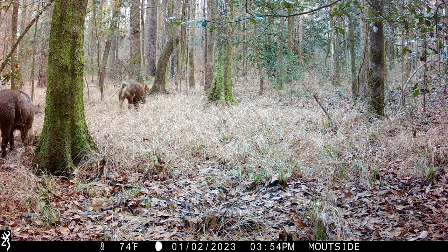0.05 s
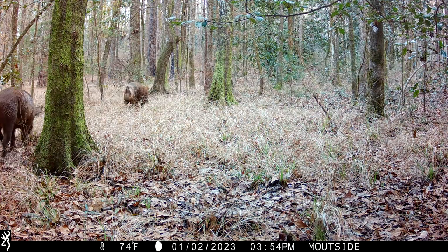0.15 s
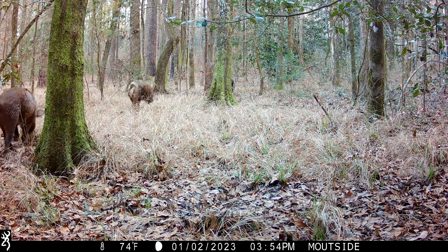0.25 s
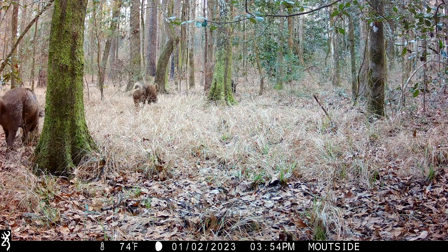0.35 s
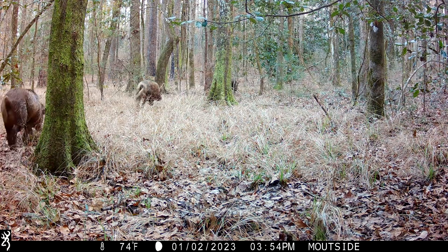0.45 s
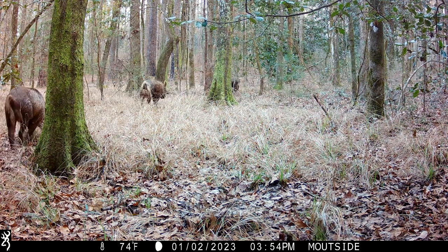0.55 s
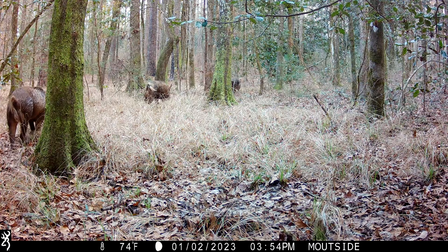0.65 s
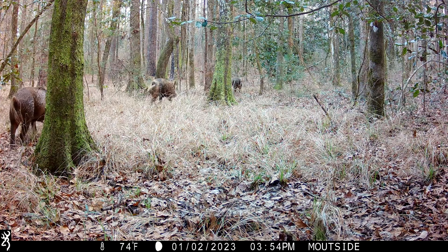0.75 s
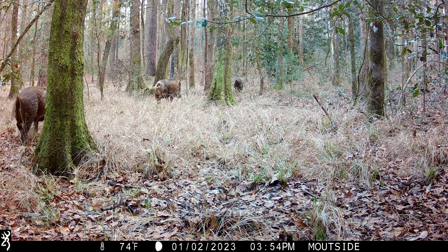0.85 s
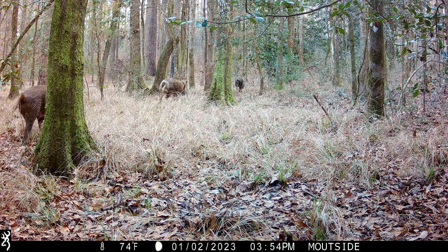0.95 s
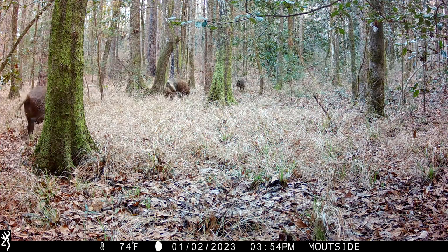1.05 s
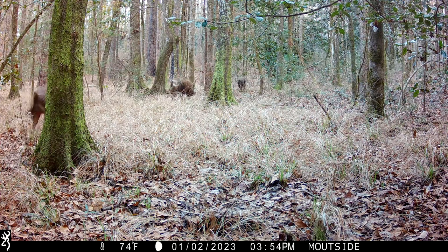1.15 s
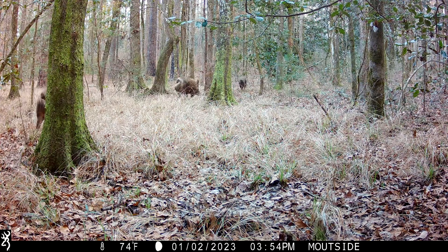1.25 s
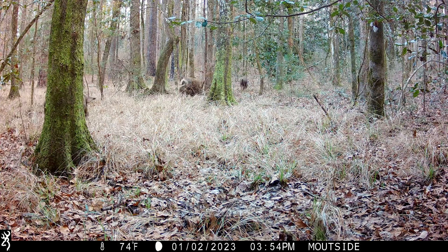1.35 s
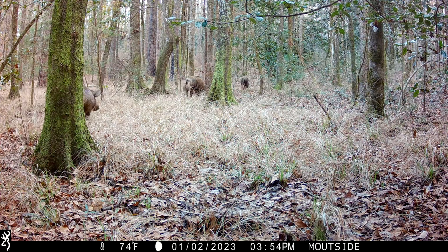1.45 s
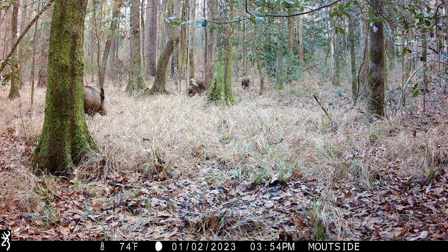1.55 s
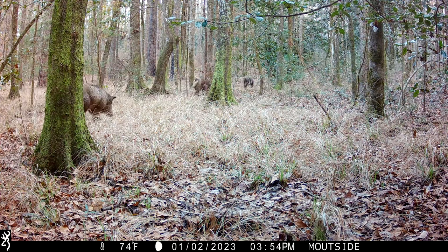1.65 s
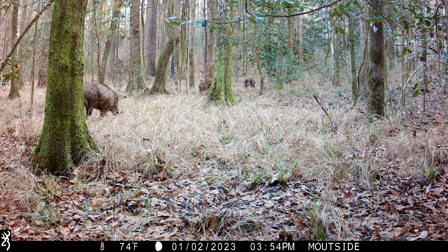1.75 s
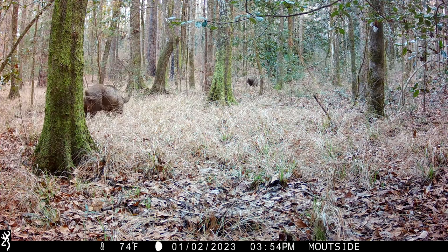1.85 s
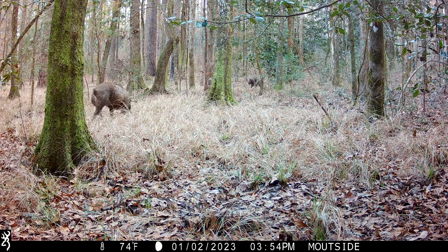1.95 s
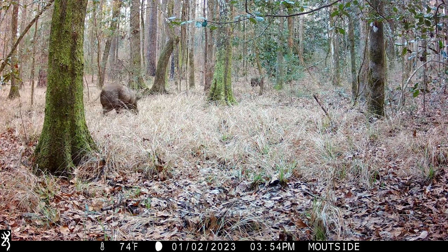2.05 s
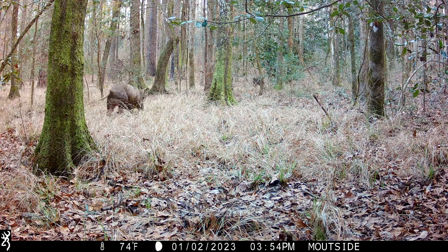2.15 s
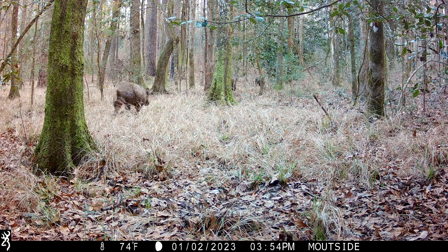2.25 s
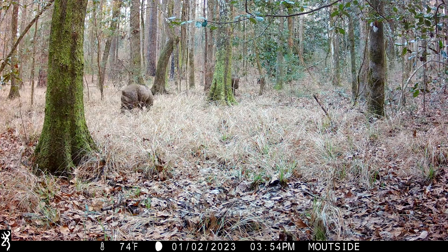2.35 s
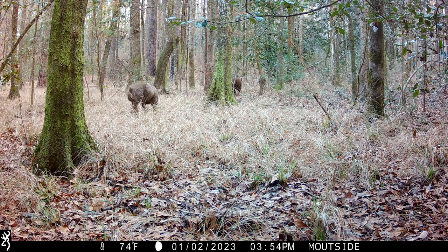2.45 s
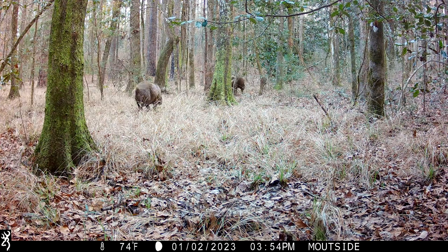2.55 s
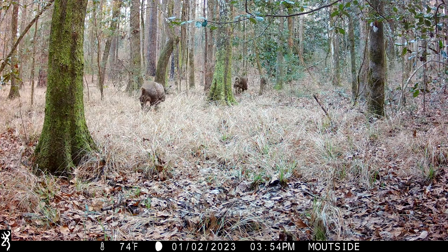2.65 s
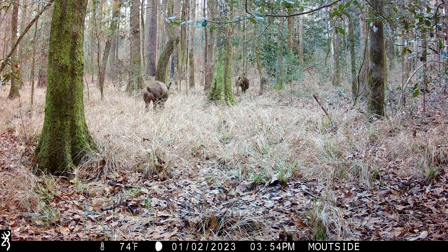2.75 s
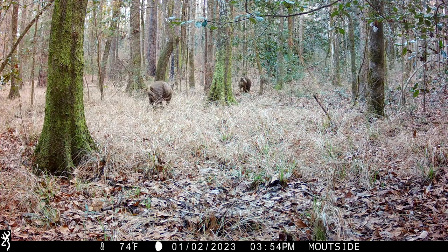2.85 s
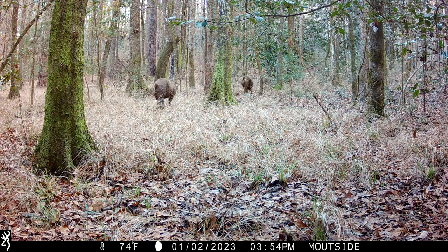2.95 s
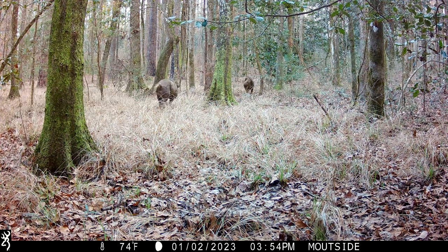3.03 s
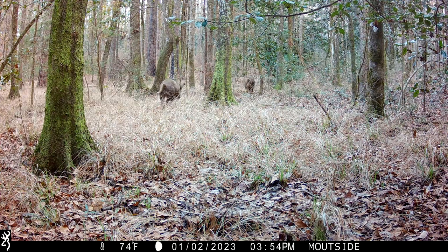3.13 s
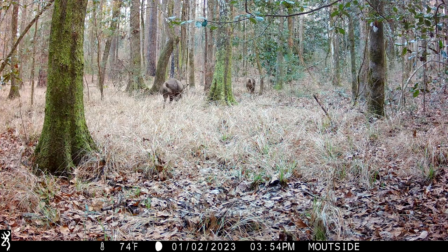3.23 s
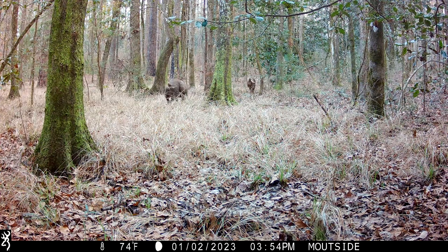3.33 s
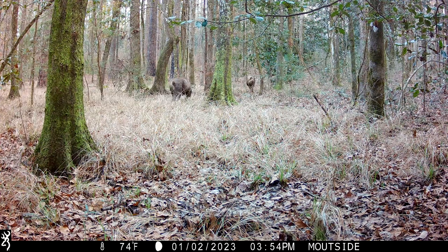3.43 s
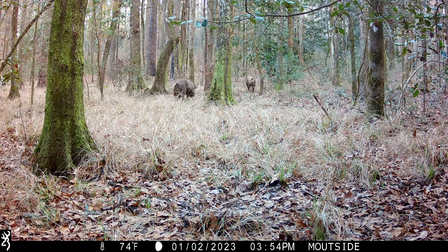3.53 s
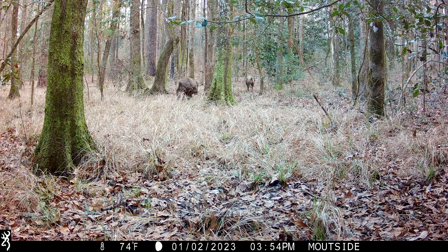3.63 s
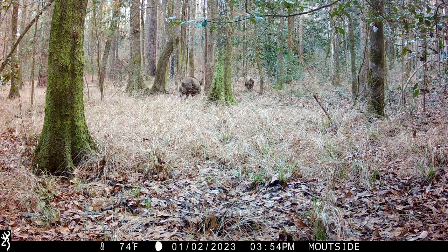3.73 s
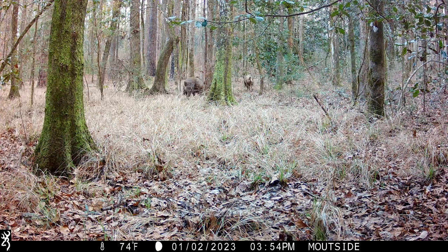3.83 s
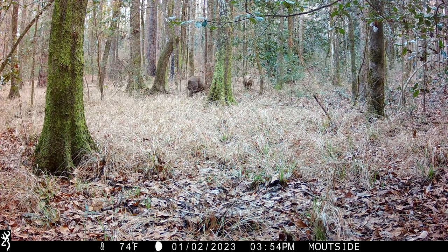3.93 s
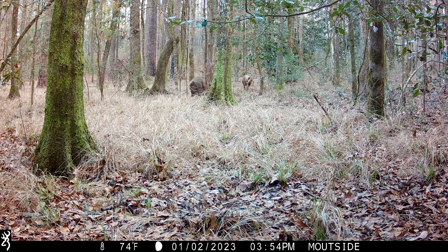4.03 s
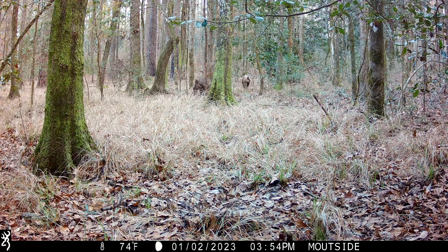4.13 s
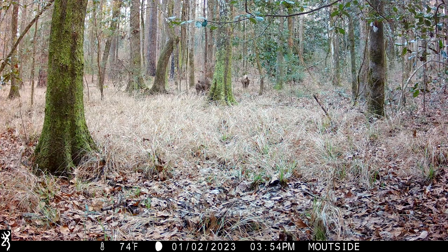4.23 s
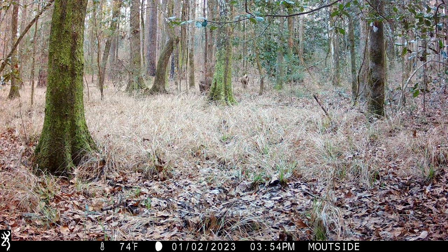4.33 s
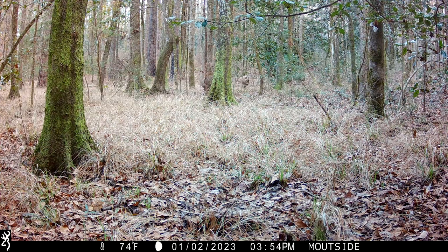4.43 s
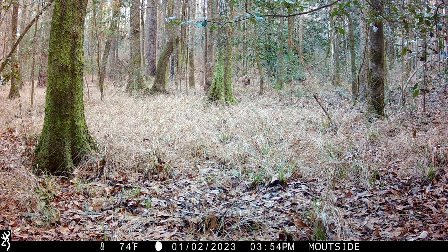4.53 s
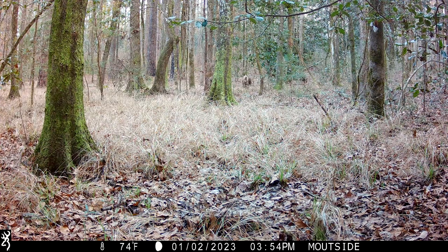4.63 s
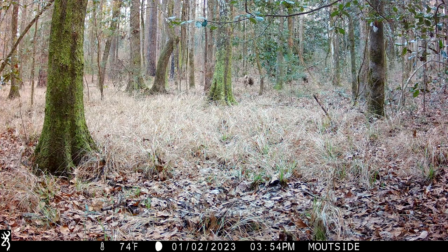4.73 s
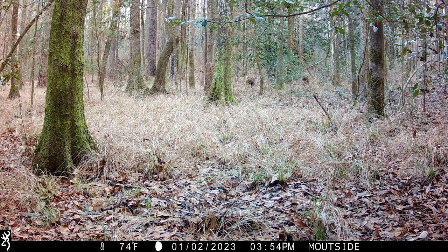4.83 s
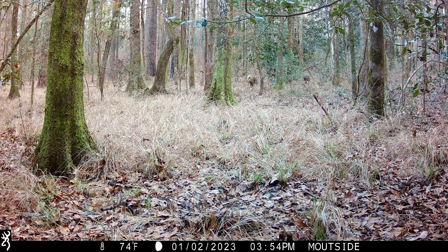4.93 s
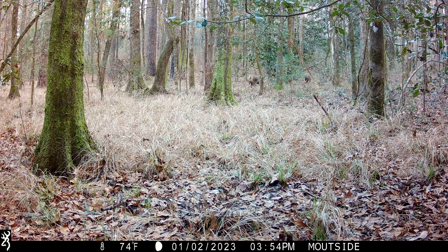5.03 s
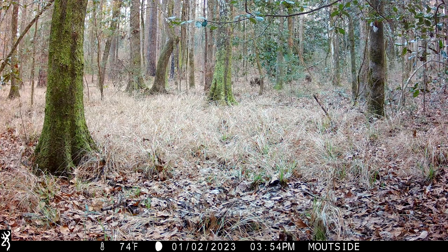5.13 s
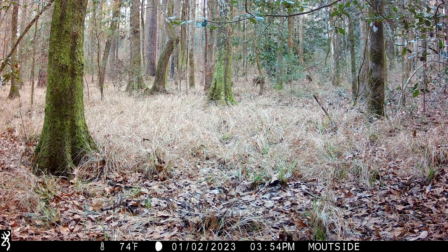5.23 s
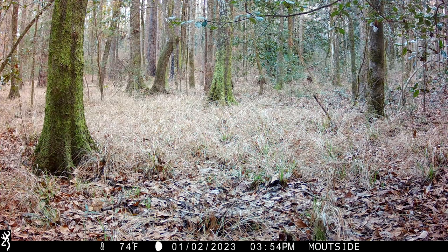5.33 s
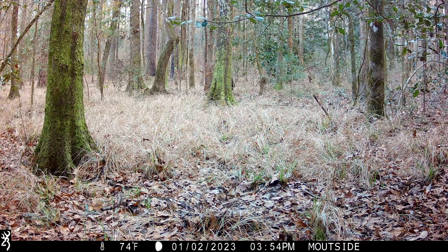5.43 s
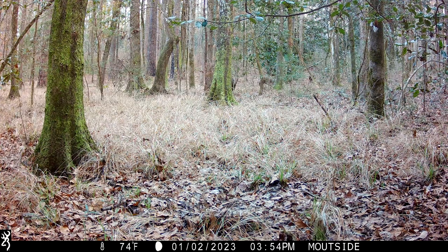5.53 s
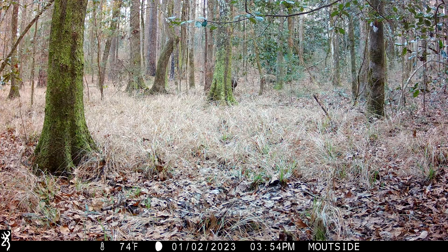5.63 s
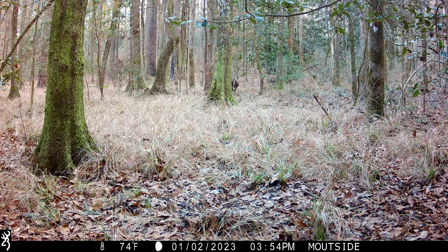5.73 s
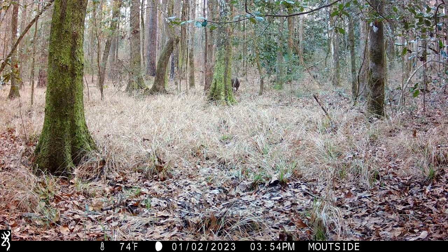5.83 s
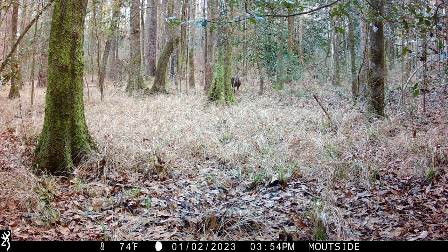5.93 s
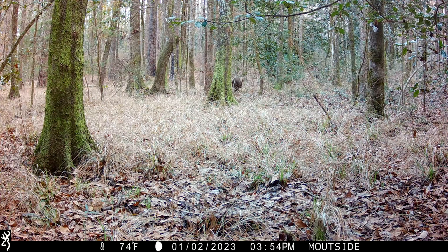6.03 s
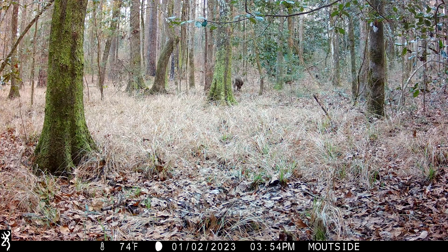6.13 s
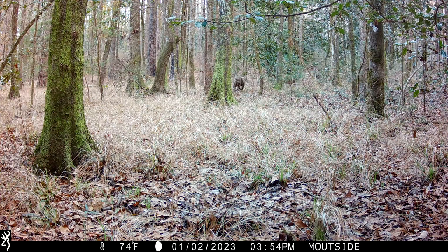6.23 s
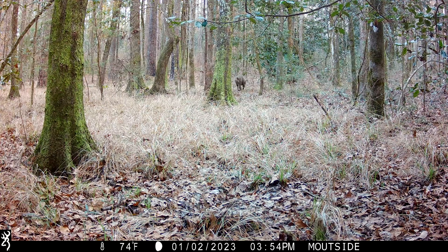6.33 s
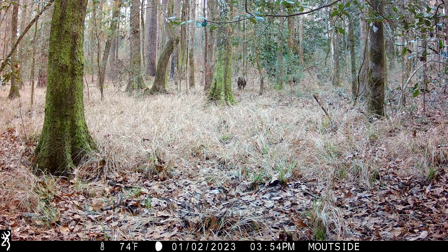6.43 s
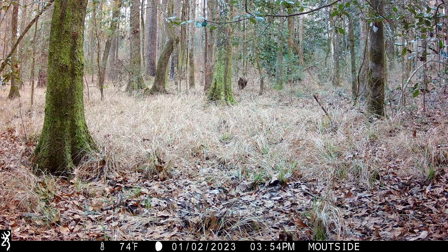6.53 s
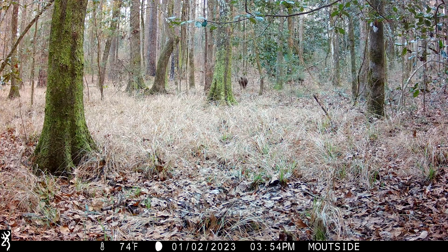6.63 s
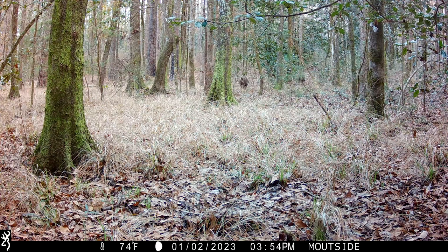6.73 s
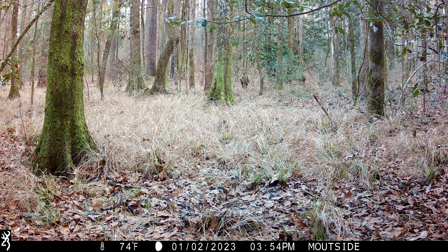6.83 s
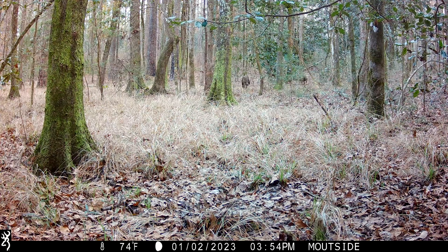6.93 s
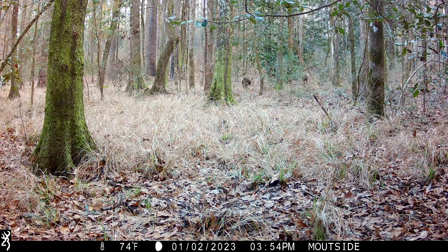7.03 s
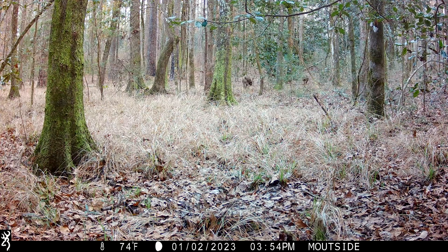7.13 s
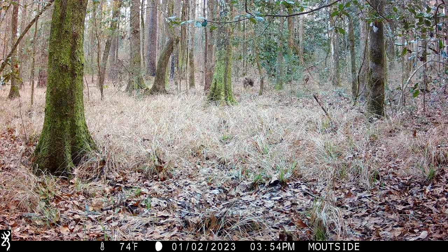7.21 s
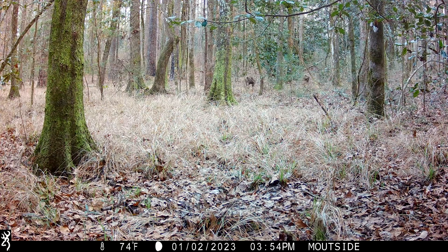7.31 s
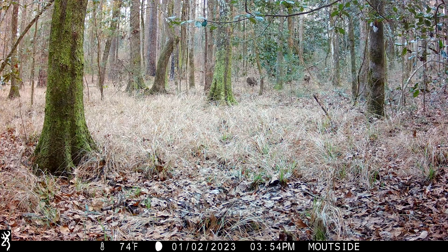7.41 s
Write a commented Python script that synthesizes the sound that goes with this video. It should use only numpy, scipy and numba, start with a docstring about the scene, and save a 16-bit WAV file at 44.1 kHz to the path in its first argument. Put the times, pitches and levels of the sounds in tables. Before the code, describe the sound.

In quiet woodland, a fixed microphone hears wild hogs walking away through dry grass and leaf litter. From the start the rustle is close and crisp, with hooves crunching and a tight burst of twig snaps around 0.1 to 0.2 seconds. Very low, soft, pulsing grunts sit under it at about 0.3 to 0.9 seconds. From 1 to 1.9 seconds the snaps are sparser while leaves keep swishing in strides. Between 2 and 3 seconds crackling thickens again, with a firm crunch near 2.5 and many brittle snaps. Short, faint grunts come around 3.2 to 3.6. After that the rustle dulls and recedes, with occasional weak ticks, more barely heard grunts near 4.8 to 5.5 and a soft swell of leaves around 5.4. By 6 to 7.4 seconds only faint, distant rustling remains over a steady airy hush, with a slight diffuse tail from the trees.

```python
"""In a wood, wild hogs walk away through dry grass and leaf litter, past the trees.
Leaves crackle as many tiny damped rings and clicks, hooves crunch as short swells of denser crackle,
twigs snap as brief rings with a sharp tick, and low, soft grunts are slow pulses through resonances.
A noise tail from the trunks follows it all except the steady hush and faint rumble of the air."""
import sys
import numpy as np
from scipy import signal
from scipy.fft import rfft, irfft
from scipy.io import wavfile
from scipy.ndimage import uniform_filter1d
from numba import njit

SR = 44100
rng = np.random.default_rng(int(sys.argv[2]) if len(sys.argv) > 2 else 0)


def to_wav(s):
    """Save 16-bit WAV."""
    ch = np.atleast_2d(s).T  # columns
    pcm = np.round(np.clip(ch, -1, 1) * 32767)  # PCM
    wavfile.write(sys.argv[1], SR, pcm.astype(np.int16))


N = 329427
T = np.arange(N) / SR  # time in s


def undb(db):
    """Turn decibels into a gain."""
    return 10 ** (np.asarray(db) / 20)


def unit(x):
    """Scale to an average strength (rms) of 1."""
    return x / np.sqrt(np.mean(x ** 2) + 1e-20)


def curves(table):
    """Join the columns of a table by straight lines in time."""
    s, *columns = np.transpose(table)
    return [np.interp(T, s, c) for c in columns]


def add(out, s, x):
    """Mix x in at time s."""
    i = max(int(s * SR), 0)
    out[i:i + len(x)] += x[:max(N - i, 0)]


def band(x, lo_hz, hi_hz, order=2):
    """Keep only the pitches between two limits."""
    sos = signal.butter(order, [lo_hz, min(hi_hz, SR / 2 - 1)], "band", fs=SR, output="sos")
    return signal.sosfilt(sos, x)


def resonate(x, hz, q):
    """One resonance, gain 1 at its centre; a higher q is narrower."""
    return signal.lfilter(*signal.iirpeak(hz, q, fs=SR), x)


def colour(x, points, size=4096):
    """Filter through (f/Hz, level/dB) points without pre-echo, so that clicks keep their sharp front."""
    hz, db = np.transpose(points)
    bins_hz = np.arange(size // 2 + 1) * SR / size
    gain = undb(np.interp(np.log(bins_hz + 1), np.log(hz), db))
    # folding the cepstrum puts the filter's energy as early as possible (minimum phase)
    cepstrum = irfft(np.log(gain))
    cepstrum[1:size // 2] *= 2
    cepstrum[size // 2 + 1:] = 0
    response = irfft(np.exp(rfft(cepstrum)))
    return signal.fftconvolve(x, response)[:len(x)]


def walk(rate):
    """Slow random wavering with a spread near 1, from `rate` new random values a second."""
    k = max(int(SR / rate), 1)
    held = np.repeat(rng.standard_normal(N // k + 1), k)
    return np.sqrt(2) * uniform_filter1d(held, k)[:N]


def burst(decay_s, size=1024):
    """A sharp crack of noise dying away at once; unit energy."""
    x = rng.standard_normal(size) * np.exp(-np.arange(size) / SR / decay_s)
    return x / np.linalg.norm(x)


@njit
def ring(starts, poles, sizes, size):
    """Each grain is one damped oscillation, turned and shrunk by its pole at every sample."""
    out = np.zeros(size)
    for k in range(len(starts)):
        z = 1. + 0j
        i = starts[k]
        while i < size and z.real ** 2 + z.imag ** 2 > 1e-5:
            out[i] += sizes[k] * z.real
            z *= poles[k]
            i += 1
    return out


def crackle(rate, spread_db, cycles, snap):
    """Tiny fractures, `rate` a second: each clicks and rings its own leaf for a few cycles."""
    when, pitch, force, side = rng.random((int(rate * N / SR), 4)).T
    starts = (when * N).astype(np.int64)
    hz = 600 * 25 ** pitch  # 600 to 15000 Hz, even in octaves
    sizes = np.sign(side - .5) * undb(-spread_db * np.log(force + .02))
    poles = np.exp((2j * np.pi - 1 / max(cycles, .5)) * hz / SR)
    rings = ring(starts, poles, sizes * hz, N)
    clicks = np.bincount(starts, sizes, N)
    return unit(unit(rings) + snap * unit(clicks))


def clumps(rate, decay_s, depth):
    """Leaves give way in clumps, about `rate` a second: each starts at once and dies down."""
    kicks = (rng.random(N) < rate / SR) * rng.uniform(0.53, 1, N)
    dying = signal.lfilter([1], [1, -np.exp(-1 / (decay_s * SR))], kicks)
    return unit(1 + depth * dying)


# tone of the quiet air and faint microphone hiss; only the shape counts: f/Hz, level/dB
AIR_TONE = [(25, -17), (60, -7), (120, -4), (250, -3.5), (480, 7.5), (900, 9.5), (2000, -0.5), (4000, 8),
            (7000, -14.5), (15500, -31.5)]
AIR_DB = -57.5  # level of the hush


def air():
    """The steady hush is shaped noise, over a faint low rumble that wavers and fades."""
    hush = unit(colour(rng.standard_normal(N), AIR_TONE))
    rumble = unit(band(rng.standard_normal(N), 98, 282)) * undb(1.0 * walk(6.8))
    return undb(AIR_DB) * hush + undb(-75.5 - 0.86 * T) * rumble


def trunks(x, wet_db, t60_s, dull_hz):
    """Trees scatter the sound back: a thin, dull noise tail that falls 60 dB in t60_s."""
    t = T[:SR]
    tail = rng.standard_normal(SR) * undb(-60 * t / t60_s)
    tail *= 1 - np.exp(-t / 0.019)  # the tail builds up over some 19 ms
    tail = unit(band(tail, 40, dull_hz, order=1)) / np.sqrt(SR)
    return x + undb(wet_db) * signal.fftconvolve(x, tail)[:N]


# grunts: t/s, length/s, pulse rate f/Hz, pitch slide as a share, level/dB, roughness 0-1,
# gain of the chest boom level/dB
GRUNTS = [(0.287, 0.019, 101, 0, -61, .2, -34), (0.446, .072, 66, -.03, -60, 0.15, -13),
          (.53, 0.16, 62.8, 0.18, -69, 0, -15), (0.689, 0.043, 74.6, -0.026, -60, 0.13, -15),
          (.745, 0.17, 66.1, -.2, -70, 0.2, -7), (1.03, 0.19, 83.5, -0.051, -75, 0, -28),
          (1.415, 0.076, 57.8, -0.0035, -68, 0.15, -18), (2.139, 0.25, 81.1, -0.042, -80, 0.17, -26),
          (2.471, 0.14, 77.7, -.05, -76, 0.54, -20), (3.242, 0.058, 81, -.05, -70.5, .3, -29),
          (3.39, 0.085, 56.7, 0, -73, .3, -14), (3.504, .06, 68, -0.034, -66, 0.5, -12),
          (3.574, .06, 61, -.05, -71, .2, -12), (4.28, .031, 79, -.05, -78, 0.4, -22),
          (4.79, 0.15, 62.3, 0.085, -72, 0.2, -7), (4.955, 0.075, 75.7, 0.033, -66, 0.38, -8),
          (5.05, 0.22, 73.4, .1, -76, 0.1, -4), (5.28, 0.25, 70, -0.018, -73.5, 0.1, -14)]
THROAT_HARMONIC = 2.12  # the throat resonates on this multiple of the pulse rate


def grunts():
    """Slow, uneven pulses of the vocal folds boom in the chest and throat behind a closed mouth."""
    out, t = np.zeros(N), T[:SR // 2]
    for s, length, rate_hz, glide, db, rough, chest_db in GRUNTS:
        throat_hz = THROAT_HARMONIC * rate_hz
        jitter, shimmer = rng.standard_normal((2, 64))  # uneven timing and uneven strength
        # the pitch slides through each grunt
        slide = glide * (np.minimum(np.arange(64) / (length * rate_hz), 1) - .5)
        times = np.cumsum(1 - slide + 0.14 * rough * jitter) / rate_hz
        times -= times[0]
        # it swells quickly, then fades
        sizes = undb(9.3 * rough * shimmer - 11 * (times / length - .3) ** 2)
        inside = times < length
        pulses = np.zeros(len(t))
        pulses[(times[inside] * SR).astype(int)] = sizes[inside]
        chest = -undb(chest_db) * resonate(resonate(pulses, rate_hz, q=2.2), rate_hz, q=2.2)
        throat = resonate(resonate(pulses, throat_hz, q=1.8), throat_hz, q=1.8)
        throat += undb(-16.5) * resonate(pulses, 490, q=3.5)
        voice = band(throat + chest, 40, 560)
        add(out, s, undb(db) * voice / np.sqrt(np.sum(voice ** 2) / (length * SR)))
    return out


# twigs, stalks and stiff leaves breaking: t/s, peak level/dB, pitch f/Hz,
# sharp tick level/dB against that peak
SNAPS = [(0.1105, -22, 1880, -31), (0.1587, -24.5, 1880, -35), (0.1807, -20.5, 3200, -21),
         (0.181, -19, 2350, -22), (0.183, -24, 1980, -35), (0.3041, -28, 2220, -37),
         (0.3433, -33, 2310, -36), (0.3493, -30, 2430, -40), (0.3537, -28, 2130, -40),
         (0.392, -26.5, 2130, -29), (0.4157, -28, 2670, -38), (0.4657, -26, 2260, -32),
         (0.4742, -32, 2330, -40), (0.5482, -32, 2330, -40), (0.5901, -23.5, 1780, -36),
         (0.5917, -31.5, 3060, -23), (0.7044, -27.5, 2170, -28), (0.8592, -29, 2290, -33),
         (0.8628, -31, 3550, -32), (0.895, -28, 3600, -40), (0.948, -28.0, 2700, -40),
         (0.9554, -36, 2260, -37), (1.0249, -31, 2480, -40), (1.3958, -34, 2330, -40),
         (1.751, -27, 1920, -40), (1.892, -34, 2590, -41), (1.9839, -26.5, 2130, -35),
         (2.0278, -29, 2330, -33), (2.0357, -26, 2000, -45), (2.0425, -27.5, 2060, -43),
         (2.0847, -29.5, 2260, -40), (2.3563, -23, 2400, -42), (2.3606, -28.5, 1910, -40),
         (2.4076, -29, 2360, -39), (2.4704, -25, 1910, -40), (2.492, -22.0, 2010, -40),
         (2.4944, -22.0, 3500, -40), (2.5067, -29, 2260, -40), (2.521, -33, 2140, -36),
         (2.5325, -31, 2030, -40), (2.5853, -24.0, 1880, -40), (2.6523, -23, 2070, -38),
         (2.689, -32, 2800, -32), (2.697, -20, 2300, -39), (2.7196, -31, 2150, -39),
         (2.7775, -30, 2330, -25), (2.7807, -29, 1960, -40), (2.8315, -27, 2250, -40),
         (2.838, -22, 1920, -36), (2.8453, -20.5, 1970, -40), (2.881, -29, 2220, -40),
         (2.957, -33, 2460, -29), (2.9726, -30, 2300, -38), (2.9892, -22.5, 2390, -40),
         (3.0325, -28.5, 1890, -40), (3.4568, -30, 2070, -42), (4.4554, -32.0, 1900, -42),
         (4.9752, -31, 2420, -40), (5.0037, -31, 2280, -36), (5.1252, -30.5, 1910, -36),
         (5.4224, -31.0, 2050, -40), (5.6451, -28.5, 1830, -38), (6.8679, -33, 2460, -40)]
TWIG_RING_S = 0.00033  # the ring takes this long to swell to its height
BITE_DB = -6  # the bright edge of a break against the ring of the twig
BITE_HZ = 6400  # the bite sounds halfway, in octaves, between this and the twig's own pitch
SPLINTER_S, SPLINTER_DB = 0.0023, -11  # decay time, and peak against the snap
SPLINTER_GAP_S = 0.00196  # longest wait for the splinters


def twigs():
    """A break bites and briefly rings the twig, small splinters follow, and a thin tick rides on it."""
    out, t = np.zeros(N), T[:1024]
    swing = t / TWIG_RING_S * np.exp(1 - t / TWIG_RING_S)
    for s, db, hz, tick_db in SNAPS:
        splinters = resonate(colour(burst(SPLINTER_S), LEAF_TONE), hz, q=0.49)
        bite = np.exp(-t / 0.00076) * np.sin(2 * np.pi * np.sqrt(hz * BITE_HZ) * t)
        twig = swing * np.sin(2 * np.pi * hz * t)
        crack = band(twig + undb(BITE_DB) * bite, 644, 5200, order=5)
        tick = band(burst(0.0026), 7400, 15500, order=4)
        wait_s = SPLINTER_GAP_S * rng.random()
        add(out, s - TWIG_RING_S, undb(db) * crack / np.abs(crack).max())
        add(out, s + wait_s, undb(db + SPLINTER_DB) * splinters / np.abs(splinters).max())
        add(out, s, undb(db + tick_db) * tick / np.abs(tick).max())
    return out


# hooves pressing into the litter: t/s, crunch level/dB before its swell, length/s,
# then against the crunch: dull thud level/dB, fizz of torn grass level/dB
STEPS = [(0.112, -38.5, 0.02, -16, -32), (0.186, -38.5, 0.018, -13, -23), (0.297, -36.5, 0.012, -29, -32),
         (0.338, -38.5, 0.017, -12, -32), (0.447, -37.5, .025, -12, -32), (0.517, -42, .02, -10, -34),
         (0.587, -36, 0.01, -11.5, -35), (0.855, -39.5, 0.019, -22, -30), (0.942, -39, 0.064, -21, -27),
         (1.366, -41.5, 0.043, -14.5, -30), (1.469, -46.5, 0.064, -13, -36), (1.749, -40, 0.028, -12, -32),
         (2.02, -39.5, 0.026, -19, -23), (2.081, -38, 0.023, -30, -29), (2.406, -37.5, 0.033, -36, -29),
         (2.484, -32, 0.025, -19, -35), (2.512, -42, .03, -26, -33), (2.584, -43, .024, -24, -30),
         (2.774, -40.5, 0.035, -23, -19), (2.816, -41, 0.025, -22, -28), (3.298, -46, 0.023, -11, -36),
         (3.489, -37.5, 0.031, -27, -32), (3.673, -45, .03, -8, -32), (4.198, -45, 0.019, -24, -32),
         (4.69, -48.5, .04, -20, -40), (5.799, -46.5, 0.031, -27, -34), (6.271, -47, 0.022, -18, -26),
         (6.49, -51.5, 0.045, -26, -32), (6.74, -50, 0.056, -24, -28), (7.314, -49, .02, -20, -34)]
STEP_ATTACK_S = .0012


def hooves():
    """Each step crushes leaves in a sudden crunch that thins out, with a dull thud and a grassy fizz."""
    crush, press, tear, t = np.zeros(N), np.zeros(N), np.zeros(N), T[:SR // 4]
    for s, db, length, thud_db, fizz_db in STEPS:
        push = undb(db) * (1 - np.exp(-t / STEP_ATTACK_S)) * np.exp(-(t / length) ** 2)
        add(crush, s, push)
        add(press, s, push * undb(thud_db))
        add(tear, s, push * undb(fizz_db))
    fractures = crackle(rate=4700, spread_db=-1.5, cycles=1.06, snap=1.0)
    crunch = unit(band(colour(fractures, LEAF_TONE), 810, 6100, order=1))
    thud = unit(band(rng.standard_normal(N), 285, 1380))
    fizz = unit(band(rng.standard_normal(N), 5400, 13000))
    return crush * crunch + press * thud + tear * fizz


# legs sweeping through the litter: t/s, length/s before the release, level/dB
STRIDES = [(0.028, 0.13, -40), (0.313, 0.17, -41), (0.484, 0.057, -48), (0.632, 0.072, -43),
           (0.781, 0.039, -42), (0.86, 0.06, -43.5), (0.922, 0.06, -44), (1.01, 0.14, -45),
           (1.195, 0.21, -45.5), (1.452, .11, -41), (1.734, 0.19, -42.5), (2.005, 0.077, -41),
           (2.24, 0.2, -43.5), (2.452, 0.16, -40), (2.666, 0.034, -42), (2.766, 0.098, -40),
           (2.918, 0.064, -39), (3.037, 0.051, -39.5), (3.167, 0.15, -42), (3.295, 0.044, -42),
           (3.433, 0.14, -40), (3.687, 0.12, -41.5), (3.916, 0.17, -44.5), (4.153, 0.17, -46),
           (4.34, 0.21, -48), (4.677, 0.18, -48), (4.914, 0.17, -45.5), (5.235, 0.088, -47.5),
           (5.329, 0.34, -44), (5.694, 0.23, -48), (5.96, 0.12, -51), (6.27, 0.035, -49.5),
           (6.342, 0.2, -50), (6.64, 0.06, -52), (6.71, 0.23, -49.5), (6.95, 0.12, -50), (7.142, 0.12, -51),
           (7.408, .055, -46.5)]
STRIDE_ATTACK_S, STRIDE_RELEASE_S = 0.014, 0.034
# feet of the whole group shuffling between the strides: t/s, level/dB
SHUFFLE = [(0, -39), (.6, -44.5), (1.7, -45.5), (2.7, -45), (3.8, -47), (5.2, -48.5), (7.4, -51)]


def stir():
    """How hard the litter is stirred: strides swell, hold and die away over the group's shuffle."""
    shuffle_db, = curves(SHUFFLE)
    power, t = undb(shuffle_db) ** 2, T[:SR]
    for s, length, db in STRIDES:
        rise = np.minimum(t / STRIDE_ATTACK_S, 1)
        sweep = rise * np.exp(-np.maximum(t - length, 0) / STRIDE_RELEASE_S)
        add(power, s, (undb(db) * sweep) ** 2)
    return np.sqrt(power)


# tone of dry leaves close by, also heard in hooves and splinters: f/Hz, level/dB
LEAF_TONE = [(150, -43.5), (230, -15), (350, -37.5), (560, -23.5), (1030, -13), (1350, -5), (1700, 1),
             (2150, 1.5), (3100, -4.5), (4300, -9.5), (5300, -19), (7000, -29), (9000, -39.5),
             (15500, -39.5)]
# tone of the same litter from far off, through the grass: f/Hz, level/dB
FAR_LEAF_TONE = [(150, -34), (350, -47), (560, -21), (1100, -12.5), (1400, -6), (1800, -0.5), (2250, -1),
                 (3000, -2.5), (4000, -8.5), (5200, -13.5), (7000, -25.5), (9000, -35.5), (15500, -40.5)]
# the hogs pass from the open grass to behind the far trees: start, duration
LEAVE_S, LEAVING_S = 2.85, 2.8
# crisp edge of the leaves and fizz of the finest blades: (near dB, far dB)
CRISP_DB, BLADE_DB = (2, -4), (-28.5, -35)
SOIL_DB, SOIL_FADE_DB_PER_S = -21, 1.9  # the dull weight on the soil fades as the hogs walk off
# dB gained by the edge and by the blades per dB of stir above its one-second average
EDGE_GROWTH, BLADE_GROWTH = 0.26, 0.13


def litter():
    """Leaves and grass crackle in clumps; as the hogs leave, the cracks dull and merge into a wash."""
    force = stir()
    surge = force / uniform_filter1d(force, SR)
    far = np.clip((T - LEAVE_S) / LEAVING_S, 0, 1)  # 0 near, 1 far
    crisp_db, blade_db = np.interp(far, [0, 1], CRISP_DB), np.interp(far, [0, 1], BLADE_DB)
    soil_db = SOIL_DB - SOIL_FADE_DB_PER_S * T
    near_leaves = crackle(rate=2000, spread_db=-0.14, cycles=5.5, snap=1.0)
    near_leaves = near_leaves * clumps(rate=28, decay_s=0.014, depth=0.22)
    far_leaves = crackle(rate=6000, spread_db=0.8, cycles=2.9, snap=1.0)
    far_leaves = far_leaves * clumps(rate=39, decay_s=0.037, depth=0.18)
    leaves = np.sqrt(1 - far) * unit(colour(near_leaves, LEAF_TONE))
    leaves += np.sqrt(far) * unit(colour(far_leaves, FAR_LEAF_TONE))
    # a harder stir is crisper
    edge = signal.sosfiltfilt(signal.butter(2, 3200, "high", fs=SR, output="sos"), leaves)
    leaves = leaves - edge + edge * undb(crisp_db) * surge ** EDGE_GROWTH
    # the finest blades fizz far above the rest; the soil answers dully
    blades = unit(band(rng.standard_normal(N), 4800, 10800))
    blades = blades * clumps(rate=25, decay_s=0.015, depth=0.53) * surge ** BLADE_GROWTH
    soil = unit(band(rng.standard_normal(N), 374, 1070))
    soil = soil * clumps(rate=25, decay_s=0.0052, depth=1.3)
    return force * (undb(-2.05) * leaves + undb(blade_db) * blades + undb(soil_db) * soil)


def scene():
    """Feet and voices among the trees, over the air."""
    feet = trunks(litter() + hooves() + twigs(), wet_db=-15.0, t60_s=0.96, dull_hz=4530)
    voices = trunks(grunts(), wet_db=-27, t60_s=0.52, dull_hz=1500)
    return (feet + voices + air())[None]


TOP_HZ = 15750


def record(dry):
    """The camera cuts the top: a steep filter removes what lies above TOP_HZ."""
    return signal.sosfilt(signal.ellip(10, .2, 70, TOP_HZ, fs=SR, output="sos"), dry)


dry = scene()
out = record(dry)
to_wav(out)
```